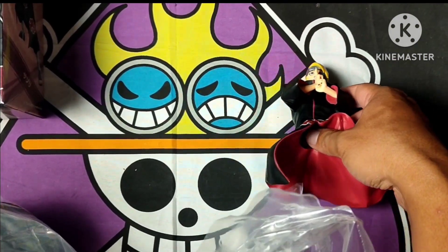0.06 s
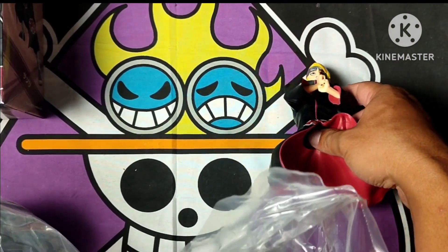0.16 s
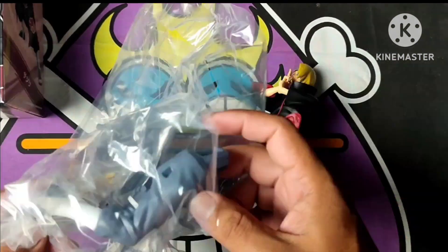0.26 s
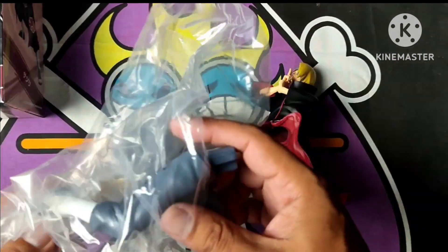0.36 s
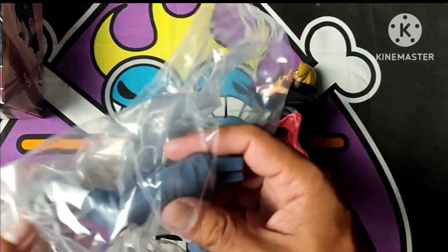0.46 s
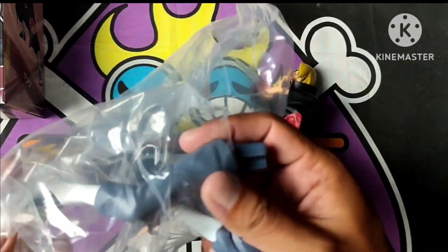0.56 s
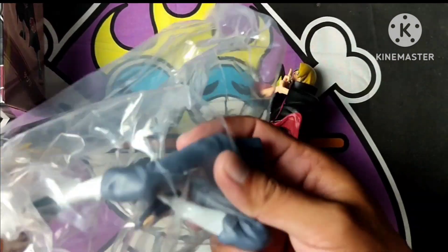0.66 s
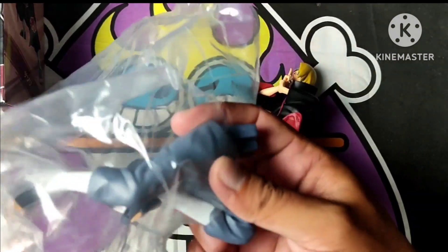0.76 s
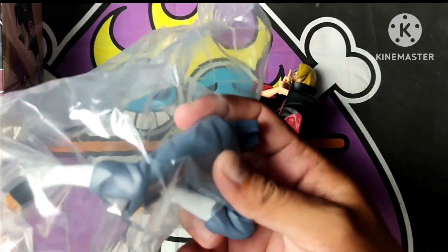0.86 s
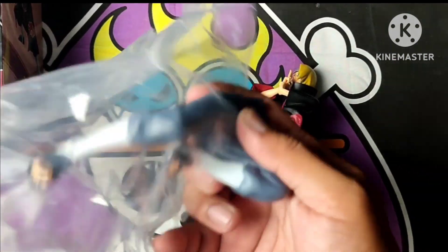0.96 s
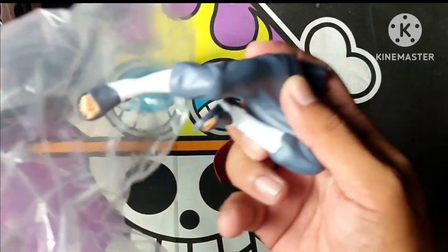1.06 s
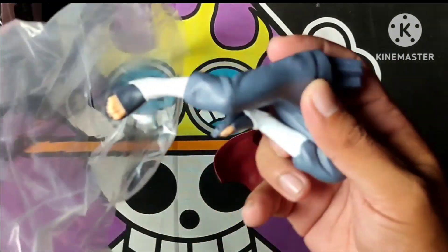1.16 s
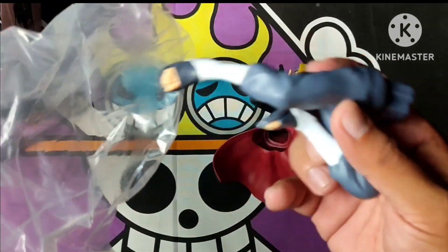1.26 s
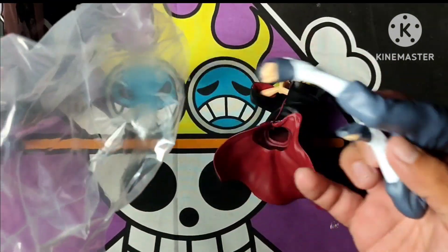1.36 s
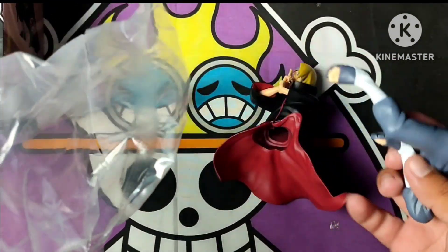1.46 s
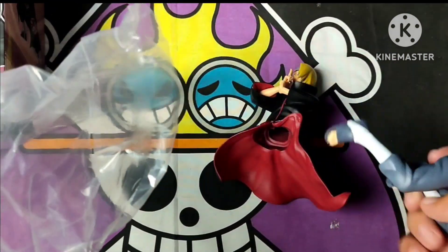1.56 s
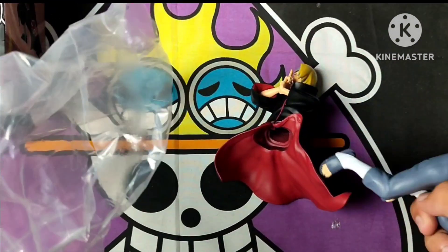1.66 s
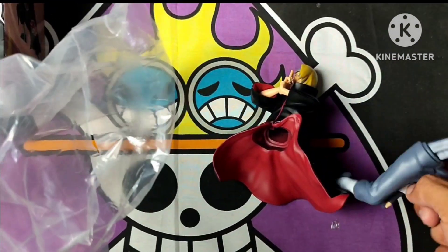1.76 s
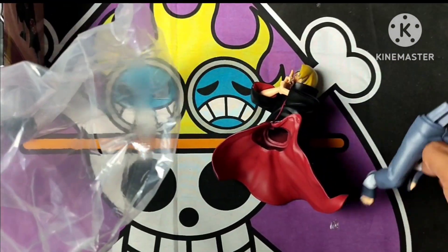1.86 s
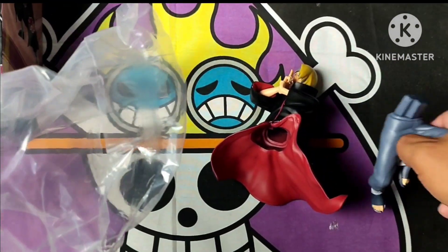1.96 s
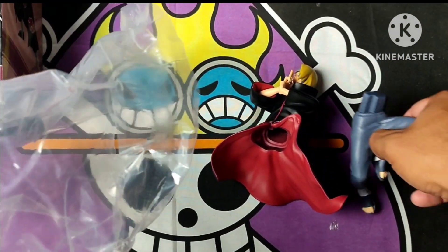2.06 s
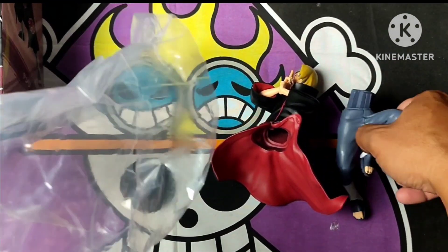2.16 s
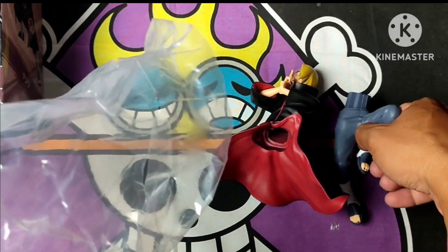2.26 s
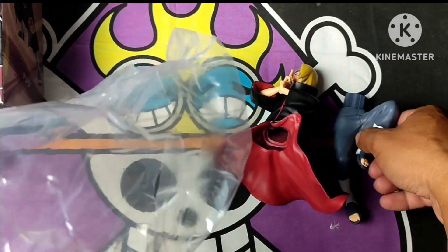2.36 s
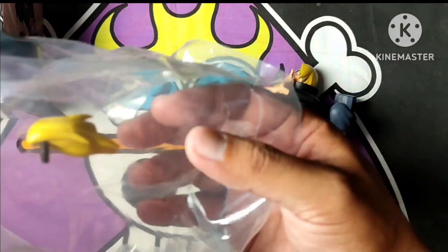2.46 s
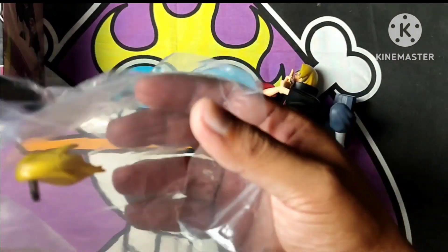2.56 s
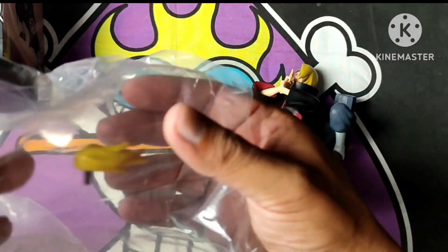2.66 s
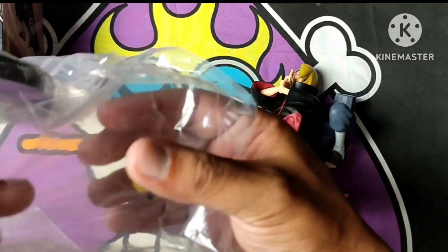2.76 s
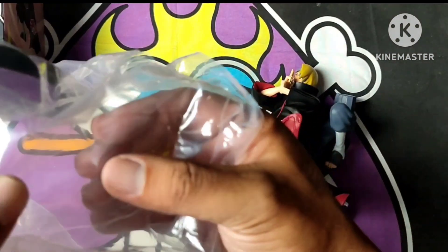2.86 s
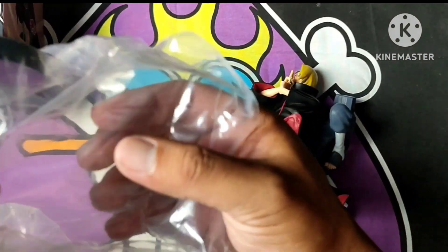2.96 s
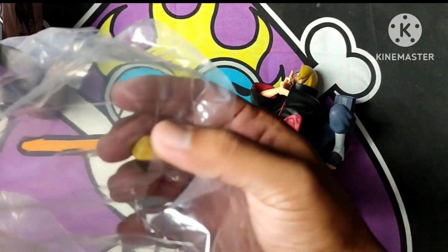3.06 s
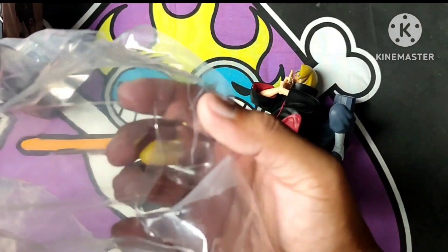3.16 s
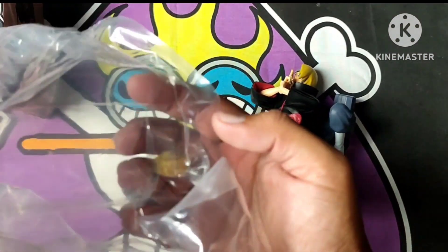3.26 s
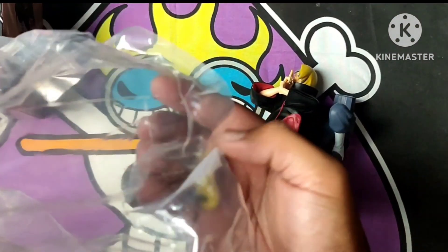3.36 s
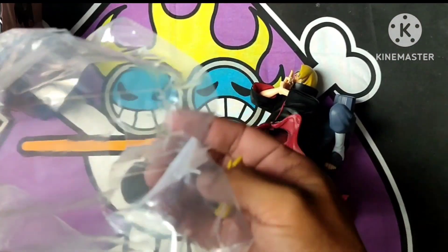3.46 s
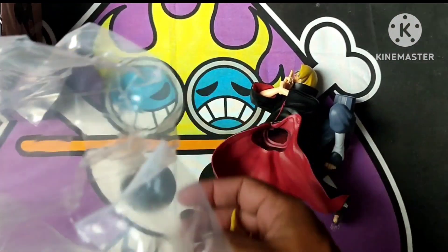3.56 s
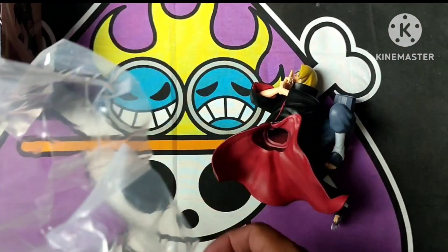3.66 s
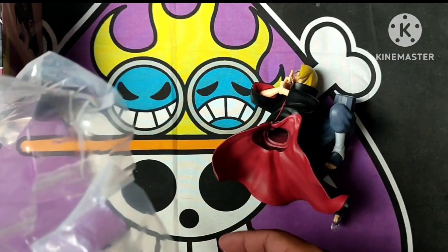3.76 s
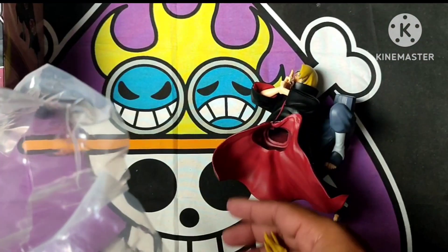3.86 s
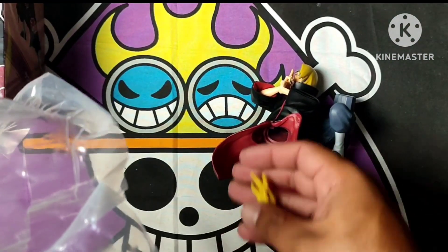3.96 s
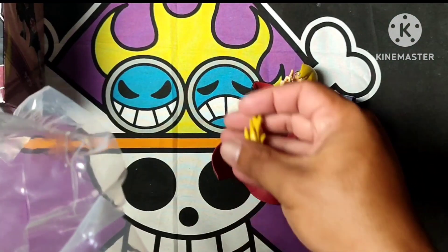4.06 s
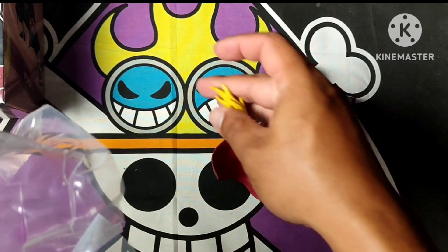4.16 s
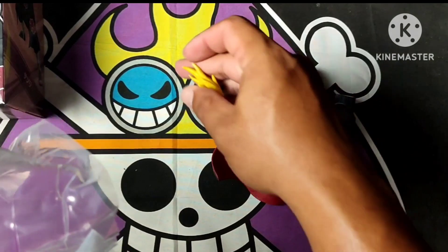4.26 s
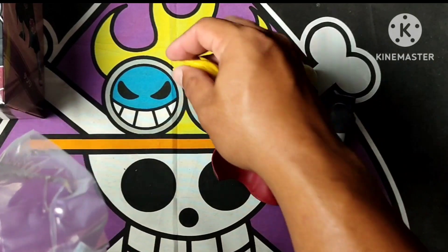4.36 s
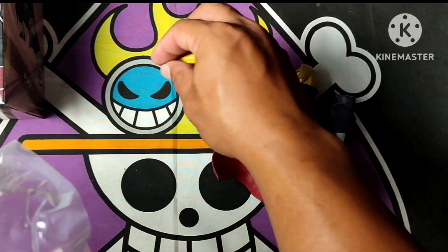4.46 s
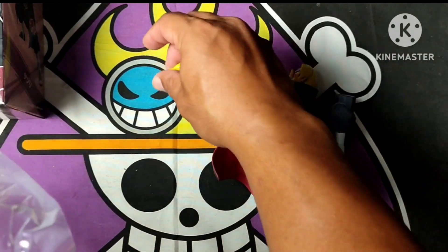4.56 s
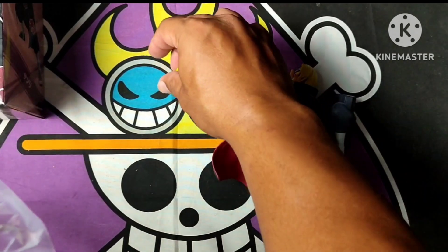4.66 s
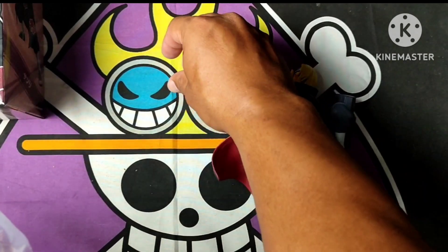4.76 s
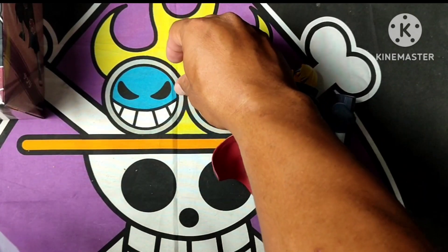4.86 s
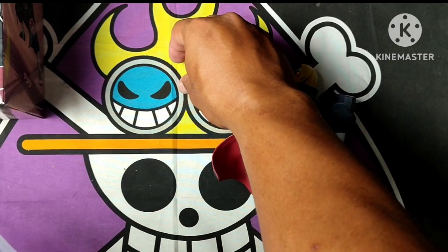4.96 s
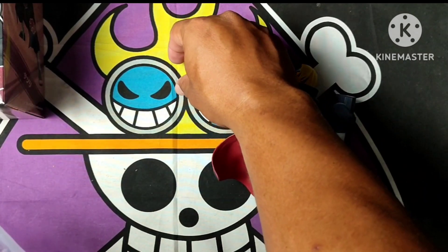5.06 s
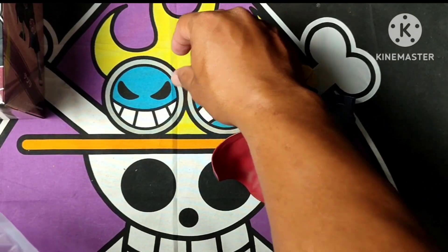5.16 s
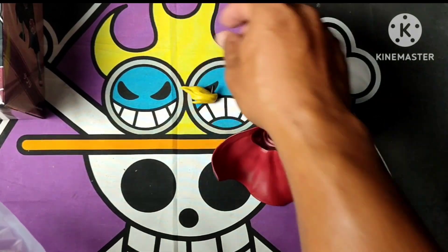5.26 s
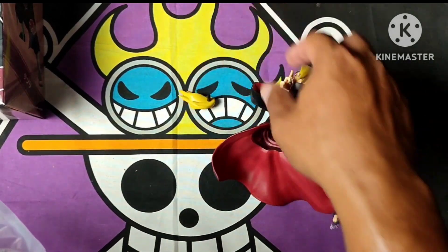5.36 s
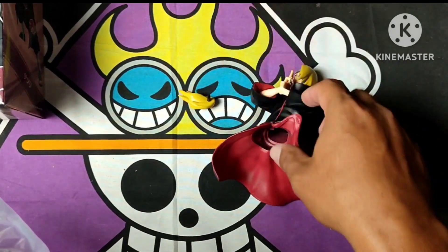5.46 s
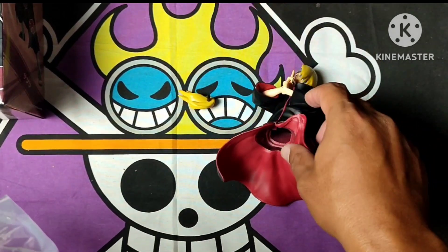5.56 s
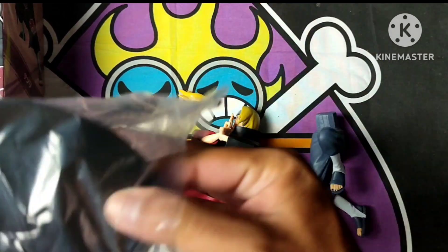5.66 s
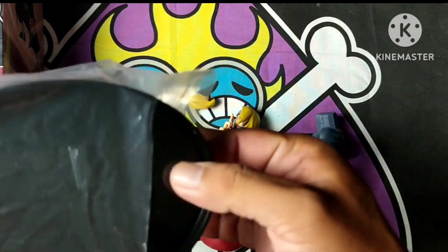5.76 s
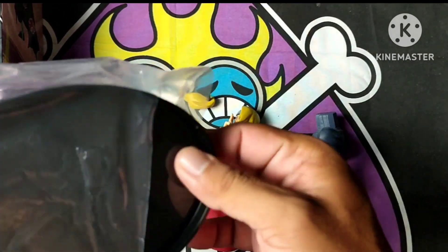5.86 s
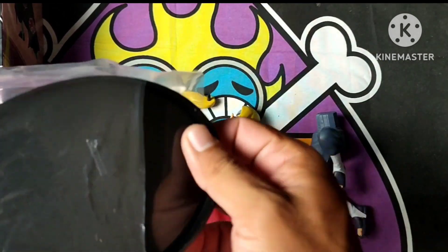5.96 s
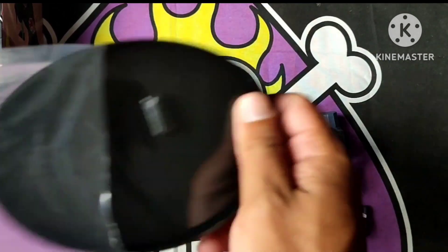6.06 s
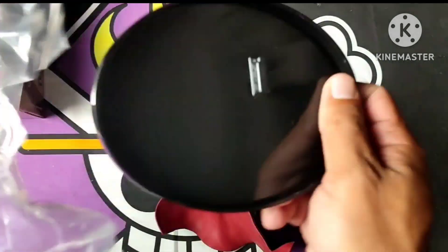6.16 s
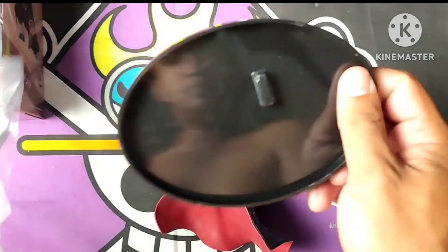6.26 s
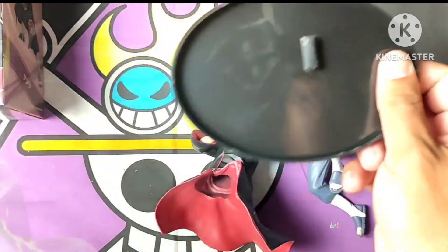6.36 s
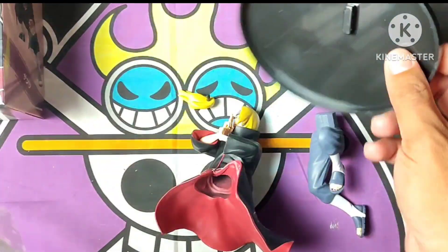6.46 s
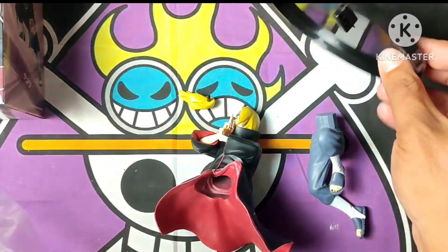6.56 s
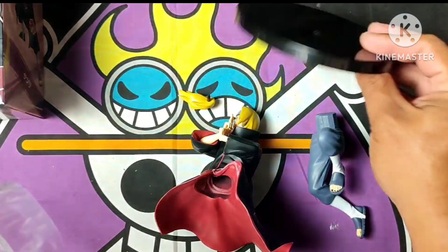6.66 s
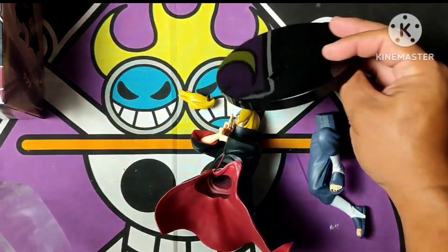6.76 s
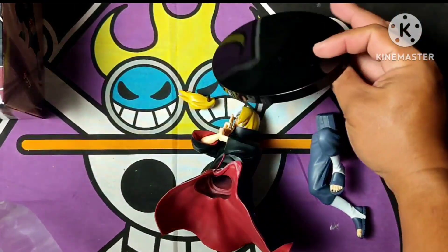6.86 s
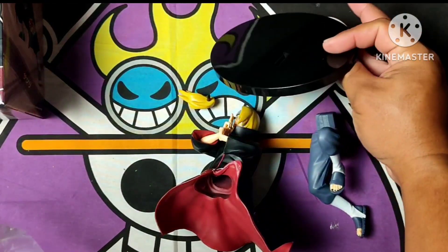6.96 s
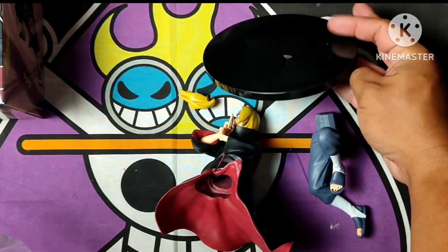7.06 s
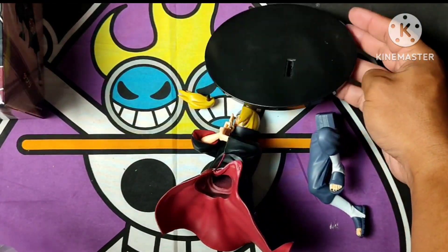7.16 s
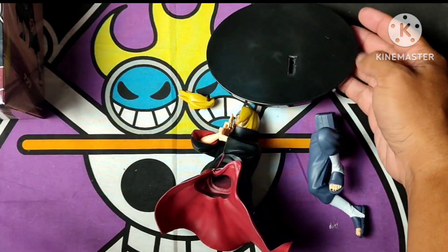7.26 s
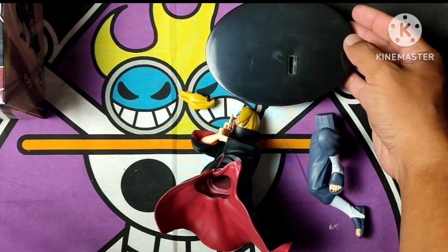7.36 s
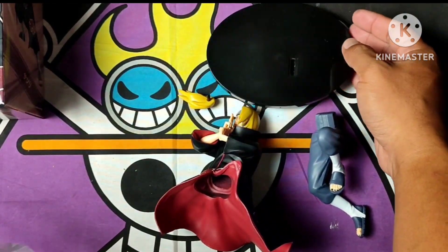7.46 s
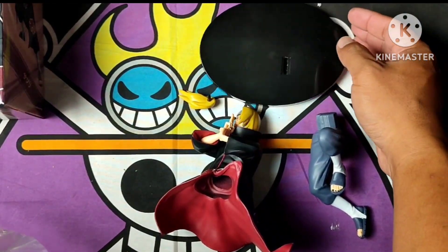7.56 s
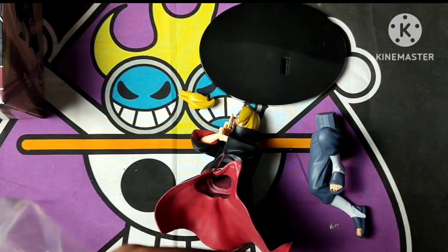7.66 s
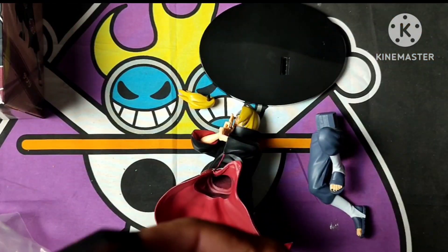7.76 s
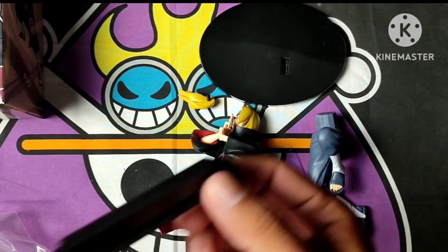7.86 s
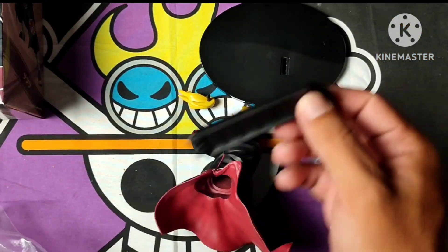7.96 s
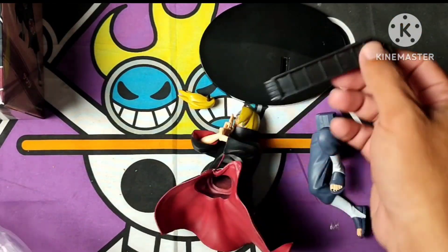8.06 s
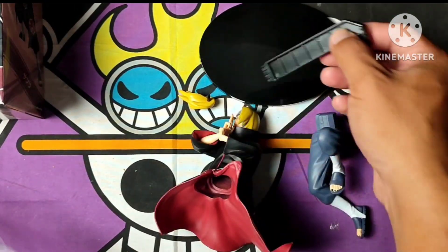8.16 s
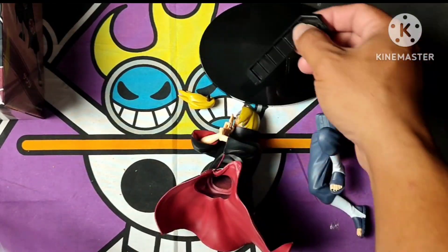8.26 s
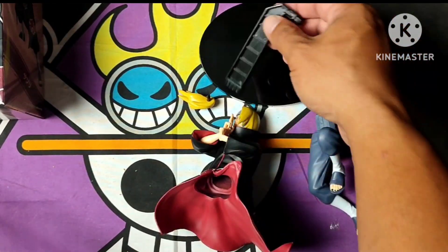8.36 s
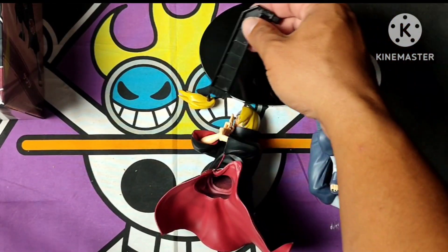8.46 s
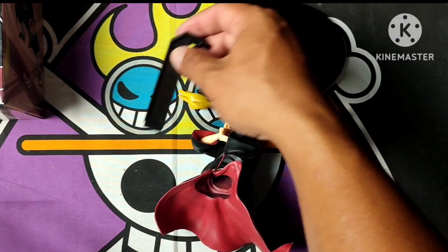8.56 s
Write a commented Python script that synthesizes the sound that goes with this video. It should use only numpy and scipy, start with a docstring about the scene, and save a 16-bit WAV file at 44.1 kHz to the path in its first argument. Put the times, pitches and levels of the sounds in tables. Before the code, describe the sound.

Thin plastic bags crackle close up while soft figure parts thud onto a cloth-covered table and a round plastic base clacks down.

```python
"""Thin bags crackle in the hands as the parts of a plastic figure are pulled out, close to the microphone.
Film buckles in swarms of tiny snaps, made of noise bursts that each ring at a facet's own pitch.
Soft parts thud on a cloth-covered table, a small piece bounces and a round base clacks: struck, damped modes.
Shaped noise and mains harmonics give a small room with a faint lamp buzz; the sound cuts out four times
for an instant."""
import sys
import numpy as np
from scipy import signal
from scipy.fft import rfft, irfft
from scipy.io import wavfile
from scipy.ndimage import uniform_filter1d

SR = 44100
rng = np.random.default_rng(int(sys.argv[2]) if len(sys.argv) > 2 else 0)


def store_wav(level_fs):
    """Save 16-bit WAV to argv[1]."""
    pcm = np.round(np.clip(np.atleast_2d(level_fs), -1, 1) * 32767)
    wavfile.write(sys.argv[1], SR, pcm.T.astype(np.int16))


N = 379701
TIME = np.arange(N) / SR

# the hand grips or pulls a bag; body is the low sound of the sheet, relative to the crackle
# columns: start_s, rise_s, length_s, crackle_db (before the mix), body_db (relative)
GRIPS = [(0.355, 0.0096, 0.35, -40, -6.5), (0.71, .03, .19, -37, -5), (0.942, 0.0098, 0.082, -42, -3.5),
         (1.04, 0.038, 0.052, -35, 0.5), (1.341, .01, .16, -43, -11.5), (1.558, .01, .22, -50, -2.5),
         (2.159, 0.013, 0.019, -43, -15), (2.355, 0.019, 0.1, -47, -4.5), (2.534, 0.0081, 0.071, -44, 0),
         (2.595, .035, 0.13, -35, -6), (2.769, .01, .025, -40, -6), (2.885, 0.0092, 0.052, -41.5, -1),
         (3.033, 0.0039, .1, -51, 2.5), (3.269, .004, 0.16, -57, -3), (5.662, 0.016, 0.012, -37, -3),
         (5.724, .025, 0.14, -35, -5.5), (5.74, 0.046, 0.07, -27, -3.5), (5.932, .008, 0.25, -38.5, -6),
         (6.178, .015, 0.019, -36, -4), (6.346, 0.023, 0.048, -40, -8), (6.472, .012, 0.0068, -41, -18),
         (7.71, 0.0078, 0.17, -45, -10)]
# spectrum of buckling film: pitch_hz, level_db (relative density)
FILM_SPECTRUM = [(60, -3), (150, -1.5), (400, 3), (650, -4.5), (1200, -3), (2500, -7.5), (5600, -7),
                 (7350, 1.5), (8500, -14), (10500, -10.5), (14400, -11.5)]


def undb(db):
    """Level definition: decibels to amplitude gain."""
    return 10 ** (np.asarray(db) / 20)


def unit(x):
    """Power normalisation: scale to an rms of one."""
    return x / np.sqrt(np.mean(x ** 2))


def peak(x, db):
    """Peak normalisation: scale the largest excursion to a level."""
    return x * undb(db) / np.abs(x).max()


def fade(t, t60):
    """Exponential damping: the amplitude loses 60 dB in t60 seconds."""
    return np.exp(-np.log(1000) * t / max(t60, .001))


def butter(x, hz, kind, order=2):
    """Maximally flat filtering: Butterworth low-pass or high-pass."""
    sections = signal.butter(order, min(hz, SR / 2 - 1), kind, fs=SR, output="sos")
    return signal.sosfilt(sections, x)


def colour(x, points, size=2048):
    """Minimum-phase filtering: a causal response through (Hz, dB) points, from the folded cepstrum."""
    hz, db = np.transpose(points)
    freqs = np.maximum(np.fft.rfftfreq(size, 1 / SR), 1)
    gain = undb(np.interp(np.log(freqs), np.log(hz), db))
    cepstrum = irfft(np.log(gain))
    cepstrum[1:size // 2] *= 2
    cepstrum[size // 2 + 1:] = 0
    response = irfft(np.exp(rfft(cepstrum)))
    return signal.fftconvolve(x, response)[:len(x)]


def ring(t, modes, stretch=1):
    """Modal superposition: a body struck at t = 0 sounds as a sum of damped sinusoids."""
    return sum(undb(db) * np.sin(2 * np.pi * hz * t) * fade(t, t60 * stretch) for hz, db, t60 in modes)


def add(track, s, sound):
    """Linear superposition: mix a sound into the track at a time in seconds."""
    start = int(s * SR)
    part = sound[:max(N - start, 0)]
    track[start:start + len(part)] += part


def wander(count=50):
    """Slow random modulation: interpolated normal draws with a spread near one."""
    return np.interp(TIME, np.linspace(0, TIME[-1], count), rng.standard_normal(count))


def room(x, wet_db, t60):
    """Diffuse reverberation: decaying noise stands for the short tail of the desk and the near walls."""
    t = TIME[:SR // 2]
    noise = butter(rng.standard_normal(len(t)), 17700, "low", order=1)
    tail = noise * fade(t, t60) * (t > .003)  # reflections start after 3 ms
    return x + undb(wet_db) * signal.fftconvolve(x, tail / np.linalg.norm(tail))[:N]


def background(waver_db=-0.7, rumble_db=3.0, rumble_hz=130):
    """Noise and harmonic excitation: uneven rumble and hiss of the room, thin buzz of a lamp."""
    # spectrum of the room: pitch_hz, level_db (relative density)
    room_spectrum = [(20, -3), (60, 0), (140, -14), (230, -13.5), (320, -18), (1000, -24), (2500, -27),
                     (5000, -32), (7400, -23.5), (8500, -40), (11500, -29), (14400, -35)]
    # lamp partials, mains harmonics around a resonance: pitch_hz, level_db (rms before the drift and mix)
    buzz_partials = [(2735, -70), (5480, -66), (5539, -71), (5722, -67), (5782, -60.5), (5900, -66),
                     (5959, -67.5)]
    # slow changes: time_s, room_db (before a small trim), buzz_db (relative)
    drift = [(0, -46, 6), (3.2, -50, -4), (3.7, -49, -0.5), (5.15, -45, 4.5), (5.3, -51.5, 0.5),
             (6.5, -50.5, -4.5), (6.95, -46.5, 2.5), (7.15, -47, -2.5), (7.55, -46, 5.5), (7.8, -47, 0)]

    drift_s, room_points, buzz_points = np.transpose(drift)
    room_db = np.interp(TIME, drift_s, room_points)
    buzz_db = np.interp(TIME, drift_s, buzz_points)

    air = butter(rng.standard_normal(N), 19.0, "high")
    air = unit(colour(air, room_spectrum, size=8192))
    # the rumble also wavers on its own, while rumble and hiss drift together with the room level
    air += butter(air, rumble_hz, "low", order=1) * (undb(rumble_db * wander()) - 1)

    buzz = np.zeros(N)
    for hz, db in buzz_partials:
        amplitude = np.sqrt(2) * undb(db + waver_db * wander())
        buzz += amplitude * np.cos(2 * np.pi * hz * TIME + rng.random())
    # each mains cycle also rasps the same resonance
    pulses = rng.standard_normal(N) * np.cos(np.pi * 60 * TIME) ** 4
    rasp = unit(colour(pulses, [(5100, -35), (5780, 0), (6400, -35)]))
    lamp = undb(-0.5) * buzz + undb(-64) * rasp
    return air * undb(room_db - 0.57) + lamp * undb(buzz_db)


def knocks(grain_db=-1, grain_t60=0.08, rattle_hz=2000, rattle_t60=0.043):
    """Contact mechanics: a soft part leaves out the highs and rings longer, a light one leaves out the lows."""
    # blows on the table; contact_hz is the upper corner of the contact, lowest_hz the lowest the part drives
    # columns: start_s, peak_db (before the room), contact_hz, lowest_hz, chatter_db (relative)
    blow_table = [(0.108, -24.5, 130, 40, -34), (1.284, -32, 383, 270.7, -26), (1.783, -2, 234, 49.9, -22),
                  (1.815, -13, 199.4, 70, -30), (1.898, -25, 261, 70, -28),
                  (2.2687, -11.5, 390, 139.4, -28), (2.277, -20, 321, 130, -16),
                  (2.433, 1.5, 357, 134, -18), (5.183, -26, 700, 250, -8), (5.219, -7.5, 1420, 200, -1),
                  (5.226, -16, 520, 220, -12), (5.237, -16.5, 1730, 298, -9),
                  (5.268, -11.5, 1450, 547, -25), (5.430, -24.5, 1070, 250, -20),
                  (5.535, -21, 263, 159.7, -32), (5.557, -24.5, 90, 35.1, -36),
                  (5.613, -30.5, 411.5, 218.4, -26), (7.0004, -0.5, 656, 141, -22.5),
                  (7.222, -19.5, 517, 220, -12), (7.245, -13.5, 280, 65.5, -25),
                  (7.553, -24.5, 220, 160, -26), (7.65, -21.5, 750, 221.4, -19),
                  (7.662, -13.5, 524, 162, -18)]
    # table top: pitch_hz, level_db (relative), t60_s (before the stretch)
    table_modes = [(53.6, -9, .12), (82, -6, 0.08), (136, -7, 0.043), (207, -3, 0.054), (251.7, -1, 0.043),
                   (345.6, -4.5, 0.035), (476, -4, .03), (631, -10, .03), (786, -1, 0.029),
                   (940, -4.5, 0.047), (1324, -7, 0.047), (1640, -3, 0.046)]
    # crowd of higher table modes: pitch_hz, level_db (relative density)
    table_grain = [(100, -9), (300, 2), (800, -3), (1600, -0.5), (2600, -6.5), (7000, -12), (9000, -27)]
    # ring length factors of a hard and a soft contact, and the corner between them in Hz
    hard_ring, soft_ring, soft_hz = 0.91, 1.88, 340

    out, t = np.zeros(N), TIME[:SR // 3]
    for s, db, contact_hz, lowest_hz, chatter_db in blow_table:
        softness = 1 / (1 + (contact_hz / soft_hz) ** 4)
        stretch = hard_ring + (soft_ring - hard_ring) * softness
        grain = unit(colour(rng.standard_normal(len(t)), table_grain))
        dense_modes = undb(grain_db) * grain * fade(t, grain_t60 * stretch)
        top = ring(t, table_modes, stretch) + dense_modes
        # hard edges of the part chatter a little even in a soft landing
        chatter = undb(chatter_db) * butter(grain, rattle_hz, "low", order=1) * fade(t, rattle_t60)
        blow = butter(top, contact_hz, "low", order=3) + chatter
        add(out, s, -peak(butter(blow, lowest_hz, "high"), db))
    return out


def buckle(t60, pitch_hz, facet_db=8.5, width=0.25, rise_s=0.0003, size=2048):
    """Snap-through buckling: one facet of film flips, a burst that rings at a pitch set by the facet's size."""
    t = TIME[:size]
    burst = rng.standard_normal(size) * fade(t, t60) * (1 - np.exp(-t / rise_s))
    freqs = np.maximum(np.fft.rfftfreq(size, 1 / SR), 1)
    away = np.log(freqs / pitch_hz) / width  # width is in natural-log units of frequency
    resonance = undb(facet_db * np.exp(-away ** 2))
    return unit(irfft(rfft(burst) * resonance))


def grip_levels():
    """Energy addition: every grip rises, holds and relaxes, and powers add; crackle and body in dB."""
    release_db_per_s = 224  # the film relaxes when the hand lets go
    crackle, body = np.full(N, 1e-12), np.full(N, 1e-12)
    for s, rise_s, length_s, db, body_db in GRIPS:
        rise = np.clip((TIME - s) / rise_s, 0, 1)
        relax_db = np.clip(release_db_per_s * (TIME - s - length_s), 0, 100)
        power = rise * undb(db - relax_db) ** 2
        crackle += power
        body += power * undb(body_db) ** 2
    return 10 * np.log10(crackle), 10 * np.log10(body)


def crinkle(per_second=480, scatter_db=3.5, grain_t60=0.019, lowest_hz=1100, octaves=3.48,
            slide_db=-10, fast_db=-34, split_hz=2400, even_s=0.0473):
    """Crackling noise: swarms of buckling facets over sliding hiss; big folds bring out the sheet's body."""
    level_db, body_db = grip_levels()
    inside = level_db > -65
    swarm = np.zeros(N)
    for place, rarity, pitch, stiffness in rng.random((int(per_second * TIME[-1]), 4)):
        now = int(place * N)
        # a gentle touch flips only the few weakest facets
        if inside[now] and stiffness < undb((level_db[now] - fast_db) / 2):
            strength = undb(-scatter_db * np.log(max(rarity, .05)))
            facet = buckle(grain_t60, lowest_hz * 2 ** (octaves * pitch))
            add(swarm, TIME[now], strength * facet)

    # the hand sets the energy that is released; chance only shares it out among the facets
    local_power = np.abs(uniform_filter1d(swarm ** 2, int(even_s * SR)))
    swarm /= np.sqrt(local_power + 1e-9)
    # in a fast pull the snaps merge into one rasp
    slide = undb(slide_db + np.maximum(level_db - fast_db, 0))
    mixed = (swarm + slide * rng.standard_normal(N)) / np.hypot(1, slide)
    film = colour(mixed, FILM_SPECTRUM)

    crackle, body = butter(film, split_hz, "high"), butter(film, split_hz, "low")
    crackle /= np.std(crackle[inside])
    body /= np.std(body[inside])
    return undb(level_db) * crackle - undb(body_db) * body


def crease(db, pitch_hz, t60=0.023, lowest_hz=900):
    """Sudden elastic release: a stiff crease gives way, brighter than the swarm."""
    film = colour(buckle(t60, pitch_hz, facet_db=3, width=.8), FILM_SPECTRUM)
    return peak(butter(film, lowest_hz, "high", order=1), db)


def snaps(tick_db=-45, tick_spread_db=4, tick_hz=4000, count=45):
    """Stress relaxation: a crease opens each grip, single ones snap later, and relaxing film ticks faintly."""
    # single creases that snap through later: start_s, peak_db (before the mix)
    single_snaps = [(0.434, -26), (0.462, -23.5), (0.543, -20.5), (0.897, -17), (1.217, -29), (1.268, -26),
                    (1.49, -20), (2.332, -21), (3.125, -28.5), (6.027, -21), (6.063, -19), (7.808, -26),
                    (8.489, -36)]
    # a grip's opening peak in dB = offset + slope * crackle level; the slower the rise, the weaker the snap
    offset_db, slope, soft_db_per_s = 7.5, 0.67, 488
    crease_hz, spread_octaves = 5730, 0.29

    out = np.zeros(N)
    opening = [(s, offset_db + slope * db - soft_db_per_s * rise_s) for s, rise_s, _, db, _ in GRIPS]
    for s, db in opening + single_snaps:
        pitch_hz = crease_hz * 2 ** (spread_octaves * rng.standard_normal())
        add(out, s, crease(db, pitch_hz))
    # folding the negative places doubles the ticks in the first two thirds
    for place, size, pitch in rng.uniform(-0.66, 1, (count, 3)):
        tick = crease(tick_db + tick_spread_db * size, tick_hz * 2 ** pitch)
        add(out, abs(place) * TIME[-1], tick)
    return out


def clack(s, db, modes, crack_db, crack_t60):
    """Impact excitation: hard plastic gives a sharp broadband crack with the ringing modes of the part."""
    # spectrum of the crack: pitch_hz, level_db (relative density)
    crack_spectrum = [(400, -4), (1500, 1.5), (2500, -8), (4600, -15.5), (7200, -8.5), (8700, -22.5),
                      (14000, -28)]
    out, t = np.zeros(N), TIME[:SR // 2]
    crack = unit(colour(rng.standard_normal(len(t)), crack_spectrum)) * fade(t, crack_t60)
    # neighbouring modes move the surface in opposite directions
    body = ring(t, modes[::2]) - ring(t, modes[1::2])
    add(out, s, undb(db) * (body + undb(crack_db) * crack))
    return out


def scene():
    """Superposition of sources: bags, blows and background meet at one microphone."""
    # small hard piece that clicks in the hand: pitch_hz, level_db (relative), t60_s
    piece_modes = [(1564, 2.5, 0.041), (1730, 4, 0.039), (1890, 0.5, 0.039)]
    # round plastic base: pitch_hz, level_db (relative), t60_s
    base_modes = [(365, -14, 0.15), (595, -8, 0.23), (784, -12, 0.16), (1003, -9.5, 0.19),
                  (1150, -12.5, 0.3), (1374, 4, .09), (1450, -11, 0.12), (1660, -1, 0.13),
                  (2170, -7.5, 0.17), (2630, -3, 0.057), (3270, -11, .07), (7050, -12, 0.068)]
    # the base touches down, falls flat and rocks once
    # columns: start_s, ring_db (gain before the room), crack_db (relative to the ring), crack_t60_s
    base_contacts = [(7, -45, 11.5, 0.08), (7.2437, -21.5, 8.5, 0.037), (7.266, -37.5, 5.5, 0.15)]

    bags = room(undb(-0.72) * crinkle() + undb(.5) * snaps(), wet_db=-8.5, t60=0.15)
    piece = clack(3.852, -28.0, piece_modes, crack_db=-8.5, crack_t60=0.04)
    base = sum(clack(s, db, base_modes, crack_db, crack_t60) for s, db, crack_db, crack_t60 in base_contacts)
    blows = room(knocks() + base + piece, wet_db=-17, t60=0.18)
    return (bags + blows + background())[None]


def record(dry):
    """Gating, saturation and band limiting: brief silences, peaks clipped at full scale, the top cut."""
    # brief silences: start_s, end_s
    silences = [(0.318, 0.352), (2.499, 2.531), (5.635, 5.659), (7.675, 7.707)]
    top_hz = 14500
    live = np.ones(N)
    for start, end in silences:
        live[(TIME > start) & (TIME < end)] = 0
    gate = uniform_filter1d(live, SR // 300)  # edges ramp over about 3 ms
    sound = np.clip(dry * gate, -1, 1)
    return signal.sosfilt(signal.ellip(10, .2, 70, top_hz, fs=SR, output="sos"), sound)


dry = scene()
out = record(dry)
store_wav(out)
```